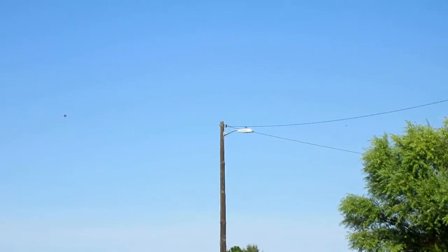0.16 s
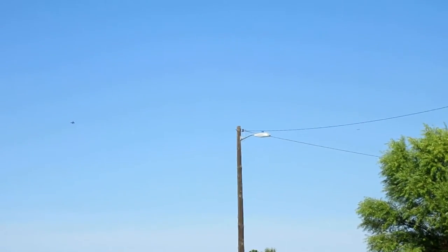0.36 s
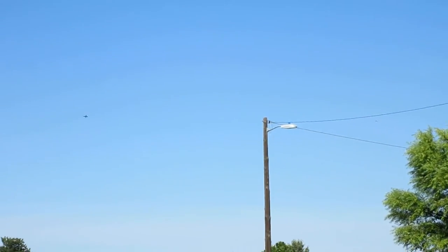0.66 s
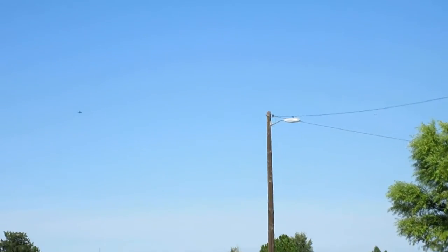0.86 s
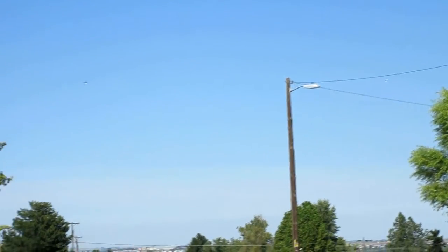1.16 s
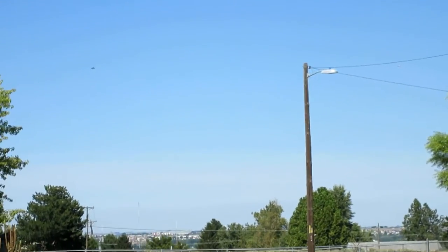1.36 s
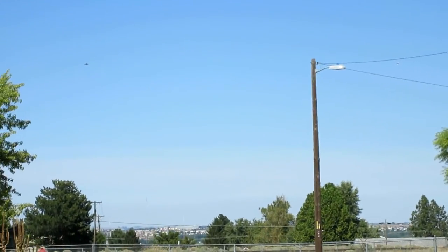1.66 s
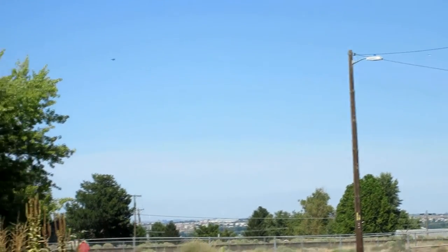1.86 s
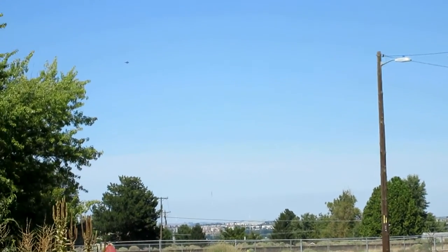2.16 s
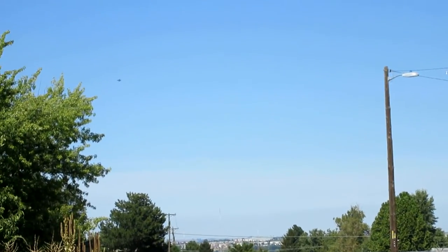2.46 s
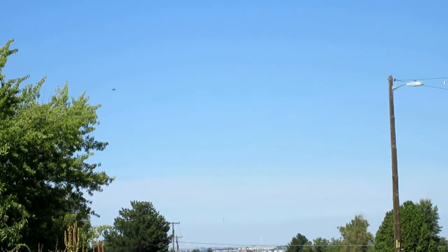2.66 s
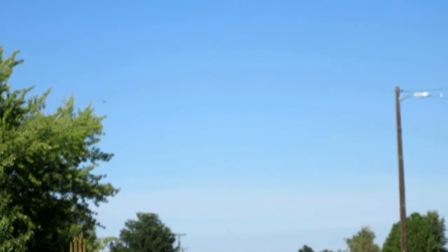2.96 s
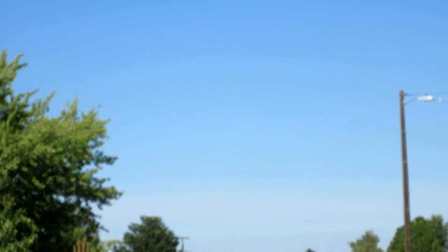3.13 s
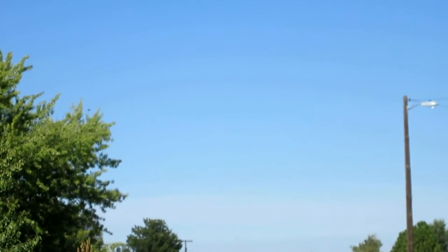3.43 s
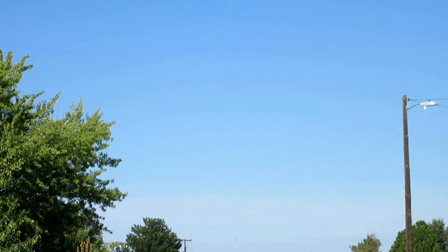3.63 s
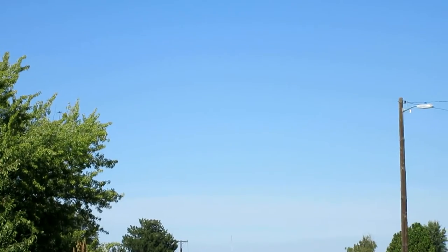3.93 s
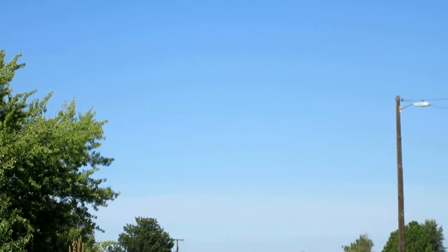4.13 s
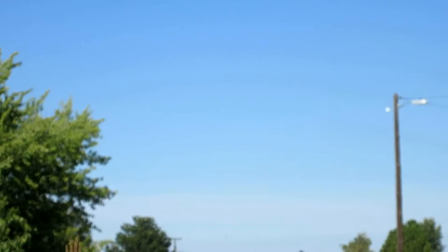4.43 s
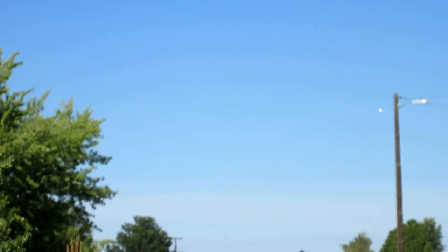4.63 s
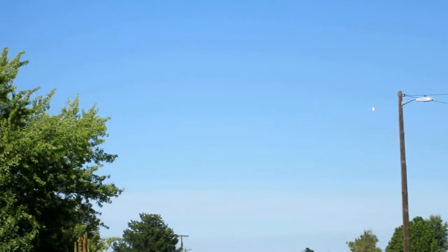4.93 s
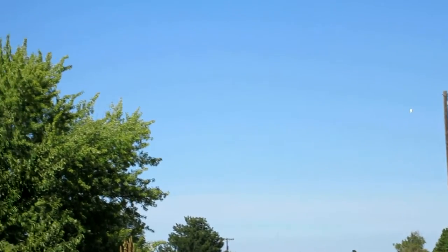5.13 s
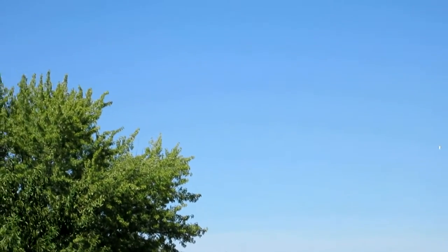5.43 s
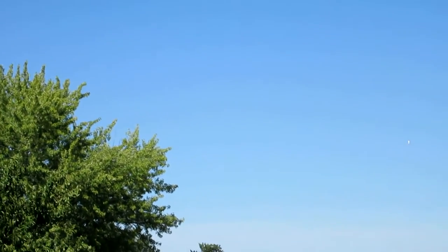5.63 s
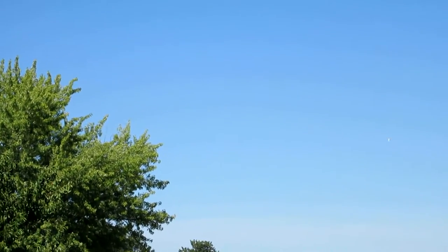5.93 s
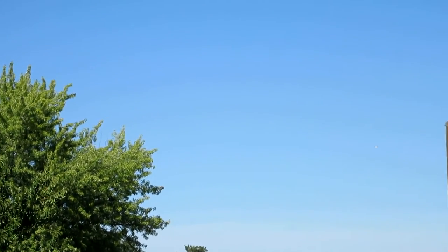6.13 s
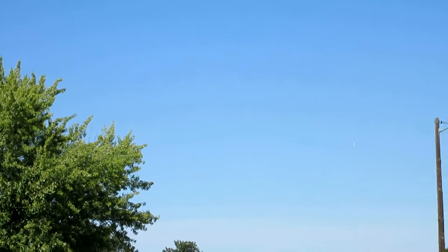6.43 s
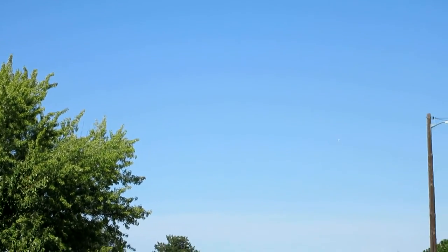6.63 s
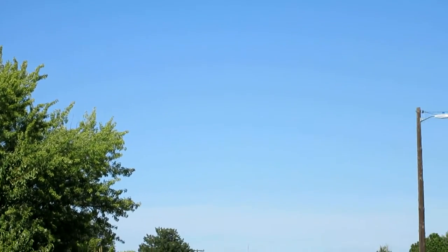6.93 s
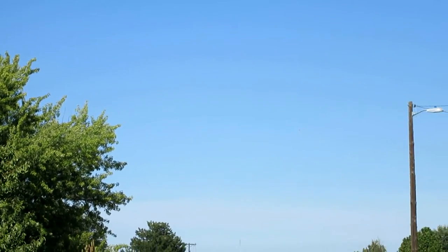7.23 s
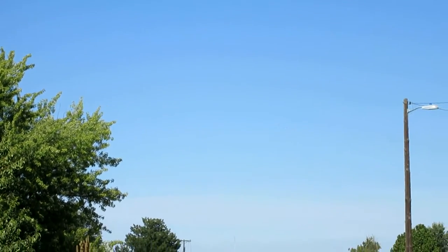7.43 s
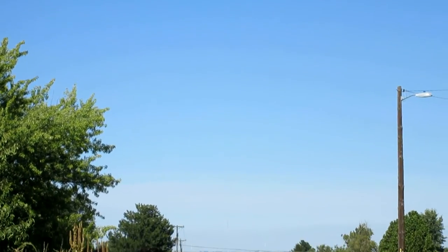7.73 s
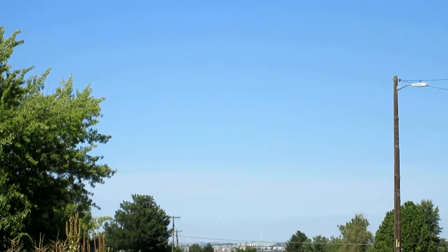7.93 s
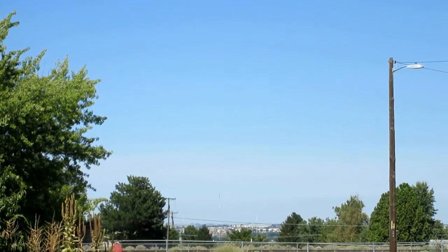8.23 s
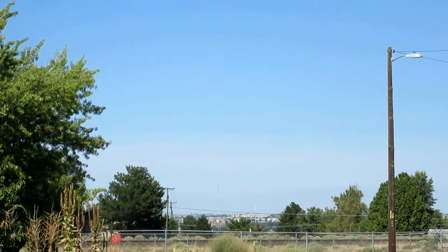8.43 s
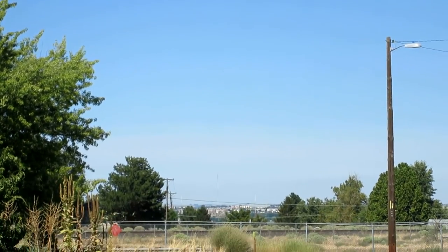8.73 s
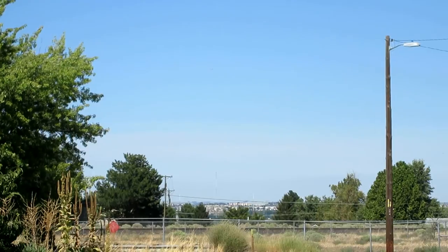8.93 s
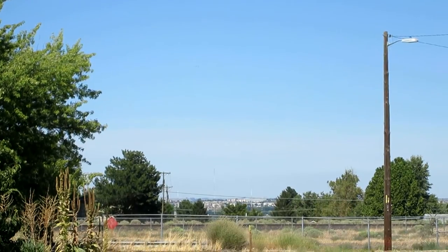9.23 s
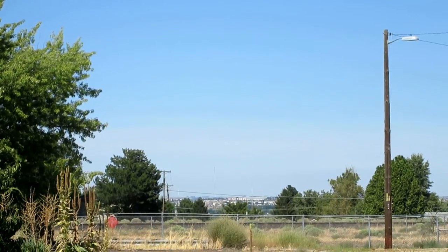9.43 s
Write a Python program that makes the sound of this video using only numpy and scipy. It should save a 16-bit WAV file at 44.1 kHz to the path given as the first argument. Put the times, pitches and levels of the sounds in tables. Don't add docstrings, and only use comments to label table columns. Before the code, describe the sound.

Outdoors over open lots, a distant jet roars from the start, deep and turbulent, with dull crackling bursts in the first four seconds. It sinks to a faint low rumble around five seconds, then builds again in uneven swells to the end. A hand-held microphone adds rustling grip, a sharp early tick, tiny creaks and soft hiss.

```python
import sys
import numpy as np
from scipy import signal
from scipy.fft import rfft, irfft, next_fast_len
from scipy.io import wavfile
from scipy.ndimage import uniform_filter1d, minimum_filter1d

SR = 44100
rng = np.random.default_rng(int(sys.argv[2]) if len(sys.argv) > 2 else 0)


def log_audio(samples):
    frames = np.atleast_2d(samples).T
    limited = np.clip(frames, -1, 1)
    pcm = np.round(limited * 32767).astype(np.int16)
    wavfile.write(sys.argv[1], SR, pcm)


def decibels_to_gain(level_db):
    exponent = np.asarray(level_db, float) / 20
    return 10 ** exponent


N = 422478


def unit(x):
    return x / np.sqrt(np.mean(x ** 2) + 1e-20)


def along(points, hz):
    point_hz, point_db = np.transpose(points)
    return decibels_to_gain(np.interp(np.log(hz + 1), np.log(point_hz + 1), point_db))


def curves(rows):
    point_s, *columns = np.transpose(rows)
    return [np.interp(np.arange(N) / SR, point_s, column) for column in columns]


def filtered(x, response):
    size = next_fast_len(N + SR // 4)
    hz = np.fft.rfftfreq(size, 1 / SR)
    return irfft(rfft(x, size) * response(hz), size)[..., :N]


def shaped_noise(points):
    return filtered(rng.standard_normal(N), lambda hz: along(points, hz))


def impulses(times_s, gains):
    return np.bincount(np.round(np.asarray(times_s) * SR).astype(int), gains, N)[:N]


# f/Hz, level/dB [dB per Hz]
HISS_SPECTRUM = [(300, -34), (1200, 18), (2200, 5), (3500, 1.5), (5000, -3.5), (7500, -5.5), (8050, 2),
                 (8600, -6.5), (10500, -8.5), (13000, -15), (15000, -20), (16000, -68)]
# t/s, remaining hiss level/dB
GAIN_DUCKS = [
    (0, -70),
    (1.15, -67.5),
    (1.55, -67.5),
    (1.84, -74),
    (2.85, -74),
    (3.73, -74.5),
    (3.98, -76),
    (8.9, -63),
    (9.27, -63),
]


def hiss():
    recover_db_per_s, full_gain_db, smooth_s = 4, -61.5, .04
    t = np.arange(N) / SR
    climbs = [np.where(t >= s, db + recover_db_per_s * (t - s), 0) for s, db in GAIN_DUCKS]
    gain_db = np.minimum(np.min(climbs, axis=0), full_gain_db)
    gain_db = uniform_filter1d(gain_db, size=int(smooth_s * SR))
    return decibels_to_gain(gain_db + 11.0) * unit(shaped_noise(HISS_SPECTRUM))


# f/Hz, level/dB [dB per Hz]
CLOTH_SPECTRUM = [(1000, -20), (2200, 5), (4000, -7), (6000, -21.5), (9000, -33.5)]
# f/Hz, level/dB [dB per Hz]
SCRATCH_SPECTRUM = [(4000, -18), (6000, 0), (9000, -6), (11500, -16), (14000, -28), (16000, -45)]
# peak t/s, rise/s and fall/s over 20 dB, level/dB, sharpness/dB
GRIP_STROKES = [
    (.73, 0.041, .2, -56.5, -20.5),
    (.855, 0.089, .24, -49.5, -18),
    (2.782, 0.013, 0.048, -56.5, -32),
    (2.9, .25, 0.57, -57, -36),
    (5.11, .05, .14, -67.5, -8),
    (8.09, .06, .1, -60, -3),
]


def rustle():
    grain = decibels_to_gain(2.2 * unit(uniform_filter1d(rng.standard_normal(N), size=130)))
    cloth = unit(grain * shaped_noise(CLOTH_SPECTRUM))
    scratch = unit(grain * shaped_noise(SCRATCH_SPECTRUM))
    out, t = np.zeros(N), np.arange(N) / SR
    for peak_s, rise_s, fall_s, db, sharp_db in GRIP_STROKES:
        drop_db = 20 * np.maximum((peak_s - t) / rise_s, (t - peak_s) / fall_s)
        out += decibels_to_gain(db + 4.0 - drop_db) * (cloth + decibels_to_gain(sharp_db) * scratch)
    return out


# f/Hz, level/dB
SHELL_RESPONSE = [(700, -12), (1300, -3), (2100, -3), (2600, -6), (3300, 0), (4400, -4), (4900, -22),
                  (6000, -45)]
# f/Hz, level/dB
LID_RESPONSE = [(3500, -40), (4900, -19), (5400, 3), (7500, -2), (10000, -17), (11000, -30)]
# f/Hz, level/dB
SEAM_RESPONSE = [(8000, -32), (10000, 1), (11200, -9), (12500, -14), (14000, -11.5), (16000, -32)]
# t/s, shell level/dB, lid level/dB, seam level/dB
SHELL_TICKS = [(.848, -58, -55, -59), (.867, -55, -57, -55.5), (0.91, -35.5, -51.5, -48),
               (0.9986, -20, -34, -52.5), (1.004, -61, -52, -66.5), (5.453, -70, -72, -54.5),
               (5.476, -83, -75, -62.5), (5.506, -36.5, -50, -59), (5.514, -66, -62.5, -48.5),
               (5.522, -47, -59, -67), (5.602, -49, -66, -66)]


def ticks():
    tick_s, *levels_db = np.transpose(SHELL_TICKS)
    rebound = lambda hz: 1 + 0.3 * np.exp(-2j * np.pi * hz * .0011)
    out = np.zeros(N)
    for db, part in zip(levels_db, (SHELL_RESPONSE, LID_RESPONSE, SEAM_RESPONSE)):
        snaps = impulses(tick_s, decibels_to_gain(db + 23.5))
        out += filtered(snaps, lambda hz: along(part, hz) * rebound(hz))
    return out


# t/s, f/Hz, level/dB
LUG_CREAKS = [
    (1.81, 3980, -62.5),
    (4.41, 3120, -62),
    (5.097, 3500, -68),
    (5.112, 3600, -69),
    (5.137, 3700, -67),
    (5.144, 4040, -63),
    (5.151, 3850, -64),
]


def creaks():
    out, t = np.zeros(N), np.arange(SR // 50) / SR
    for start_s, hz, db in LUG_CREAKS:
        slip_rad = np.cumsum(rng.normal(0, .22, len(t)))
        envelope = decibels_to_gain(db + 14 - 60 * t / .016) * (1 - np.exp(-t / 0.00088))
        out[round(start_s * SR):][:len(t)] += envelope * np.sin(2 * np.pi * hz * t + slip_rad)
    return out


def ground(hz, delay_s=0.00201, turn_rad=0.79):
    strength = .62 / (1 + (hz / 1150) ** 4)
    return 1 + strength * np.exp(1j * (turn_rad - 2 * np.pi * hz * delay_s))


# f/Hz, level/dB
FRONT_SPECTRUM = [(60, -15), (250, -5.5), (800, 0), (1500, -13.5), (2300, -28), (2900, -43), (3400, -61.5),
                  (4500, -100)]
# t/s, peak level/dB
SHOCK_FRONTS = [(0.455, -32), (1.2424, -36), (1.7413, -34), (1.8288, -31.5), (1.855, -42.5),
                (1.8708, -35.5), (1.886, -32.5), (1.8928, -46), (1.9032, -36.5), (1.9109, -37.5),
                (1.931, -35), (1.965, -40), (1.9816, -38.5), (2.7011, -33.5), (3.676, -34.5), (3.6816, -34),
                (3.701, -35.5), (3.725, -42.5), (3.7526, -31), (3.7713, -37), (3.8497, -37), (3.882, -45),
                (3.91, -38), (3.928, -37), (3.9463, -28.5)]


def shocks():
    front_s, db = np.transpose(SHOCK_FRONTS)
    fronts = impulses(front_s + .001, decibels_to_gain(db + 52.5))
    return filtered(fronts, lambda hz: along(FRONT_SPECTRUM, hz) * ground(hz))


RANGE_CENTRES_HZ = [70, 145, 230, 520, 980, 1500, 2200]
# t/s, half length/s, level/dB, centre f/Hz
AIR_EDDIES = [(0.036, 0.036, -0.5, 1160), (0.14, 0.19, 8, 995), (0.796, 0.033, 5, 762),
              (1.23, 0.106, 5.5, 710), (1.512, 0.054, -6.5, 281), (1.66, 0.146, 4, 151.5),
              (1.712, 0.041, 8.5, 1158), (1.91, 0.095, 11, 640), (1.974, 0.07, -8.2, 68.3),
              (2.213, 0.061, 5.0, 671), (2.517, 0.04, 9.5, 111.4), (2.556, 0.049, 8, 830),
              (2.766, 0.11, 9, 204), (2.8, 0.057, 7.5, 810), (3.246, 0.25, 11.5, 110),
              (3.695, 0.072, 10.5, 686), (3.928, 0.035, 1.5, 1146), (4.019, 0.04, -4.5, 1100),
              (4.527, 0.16, -11, 80), (5.338, 0.12, 6.5, 358), (6.08, 0.16, 4, 302),
              (6.333, 0.036, 7.5, 111), (6.415, 0.08, -8.2, 340), (6.694, 0.109, 8.5, 755),
              (7.252, 0.235, 6, 745), (7.85, 0.22, 5.5, 59.3), (8.076, 0.3, 7, 218),
              (8.542, 0.049, 6.5, 172), (8.844, 0.08, 12, 380), (9.247, 0.083, 13.5, 702)]


def eddies():
    reach_octaves = 0.64
    t, gains_db = np.arange(0, N, 64) / SR, 0
    for s, half_s, db, hz in AIR_EDDIES:
        octaves = np.log2(np.divide(RANGE_CENTRES_HZ, hz))
        reach = np.exp(-.5 * (octaves / reach_octaves) ** 2)
        gains_db = gains_db + db * reach[:, None] * np.exp(-.5 * ((t - s) / half_s) ** 2)
    return [np.interp(np.arange(N) / SR, t, row) for row in gains_db]


def patchy(patchy_db):
    z = signal.stft(rng.standard_normal(N), nperseg=1024)[2]
    field = uniform_filter1d(rng.standard_normal(z.shape), size=5, axis=0)
    field = uniform_filter1d(field, size=18, axis=1)
    return signal.istft(z * decibels_to_gain(patchy_db * unit(field)), nperseg=1024)[1][:N]


def evened(x, over_s, share):
    size = int(over_s * SR)
    power = uniform_filter1d(uniform_filter1d(x ** 2, size=size), size=size)
    power = np.abs(power) + 1e-20
    return unit(x / power ** (np.clip(share, 0, 1) / 2))


# t/s, level/dB, air path clarity/dB
JET_ARRIVAL = [(0.0, -19, -6), (0.61, -19, -1.5), (0.88, -15.5, -8.5), (1.57, -17.5, -5.5),
               (2.24, -16, -8.5), (3.16, -26.5, -1.5), (3.46, -21, -5.5), (3.9, -16.5, -4.5),
               (4.22, -24.1, -10.5), (4.61, -23.5, -12.5), (4.96, -34, -8.5), (5.69, -30.5, -8.5),
               (5.84, -28.5, -6), (7.03, -16, -14.5), (7.67, -22.5, -10.6), (8.37, -21.5, -9.5),
               (8.95, -18.5, -8), (9.58, -20.5, -6.5)]
# f/Hz, level/dB [dB per Hz]
PLUME_SPECTRUM = [(15, -55.5), (32, -27), (45, -17), (70, -13.5), (120, -3), (190, -1), (330, -5.5),
                  (640, -10.5), (800, -15), (1050, -28.5), (1450, -35), (2200, -54.5), (3200, -75.5),
                  (5000, -110)]
RANGE_BORDERS_HZ = [1, 105, 185, 305, 800, 1250, 1900, 20000]
# level/dB, share of level [1], of clarity [1]
RANGE_PATHS = [
    (-23, 0.5, -0.25),
    (-3, 1.042, 0.014),
    (-3.5, 1.05, 0.1),
    (-0.02, 1.047, 1.178),
    (-6.5, 1.018, 1.3),
    (-17, 1.02, 1.51),
    (-31, 0.92, 1.36),
]


def jet():
    level_db, clear_db = curves(JET_ARRIVAL)
    ranges_db = [db + follows * level_db + clears * clear_db + eddy_db
                 for (db, follows, clears), eddy_db in zip(RANGE_PATHS, eddies())]
    share = .9 * np.clip((ranges_db[4] + 38) / 14, 0, 1) ** 2
    fronts_per_s = 150
    heights = decibels_to_gain(np.minimum(3 * rng.exponential(size=N), 9))
    fronts = (rng.random(N) < fronts_per_s / SR) * heights
    source = unit(patchy(patchy_db=2.2))
    crackling = (source + share * unit(fronts)) / np.sqrt(1 + share ** 2)

    def below(hz, edge_hz):
        return 1 / (1 + (hz / edge_hz) ** 8)

    out = np.zeros(N)
    for db, low_hz, high_hz in zip(ranges_db, RANGE_BORDERS_HZ, RANGE_BORDERS_HZ[1:]):
        def response(hz):
            band = below(hz, high_hz) - below(hz, low_hz)
            return along(PLUME_SPECTRUM, hz) * ground(hz) * band

        noise = filtered(crackling if low_hz > 250 else source, response)
        out += decibels_to_gain(db) * evened(noise, over_s=.15, share=0.79)
    return out


def scene():
    return (hiss() + rustle() + ticks() + creaks() + shocks() + jet())[None]


def band_limit(x):
    return signal.sosfilt(signal.butter(12, 15010, fs=SR, output="sos"), x)


def record(dry):
    opened = dry * np.clip(np.arange(N) / (.006 * SR), 0, 1)
    needed = np.minimum(1, .95 / (np.abs(opened) + 1e-9))
    gain = uniform_filter1d(minimum_filter1d(needed, size=400), size=400)
    return band_limit(opened * gain)


dry = scene()
out = record(dry)
log_audio(out)
```